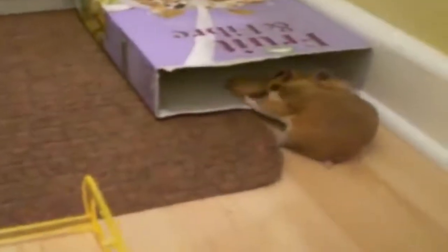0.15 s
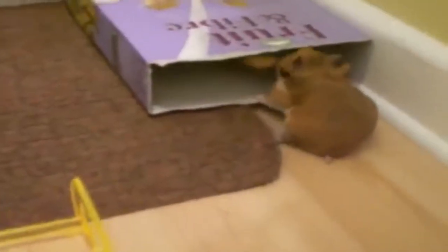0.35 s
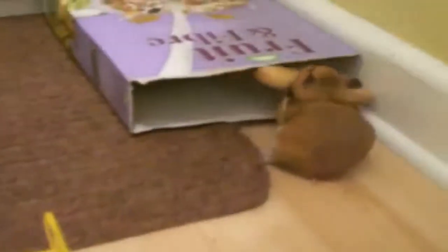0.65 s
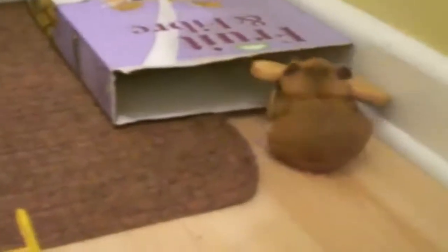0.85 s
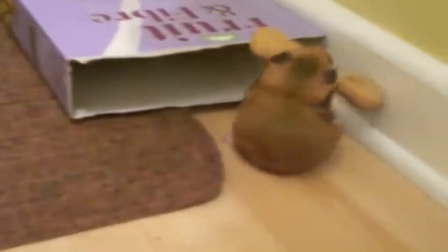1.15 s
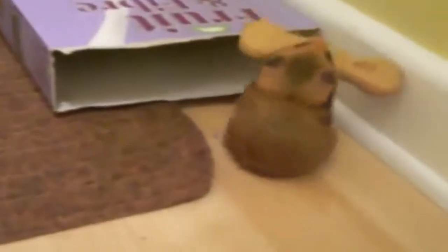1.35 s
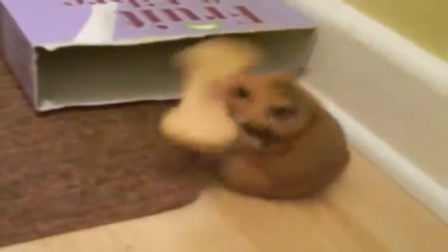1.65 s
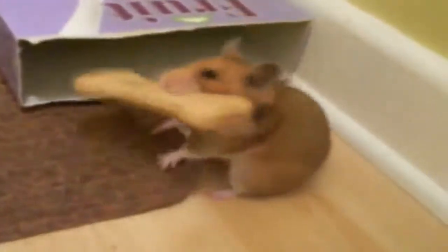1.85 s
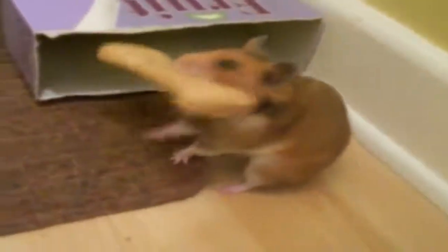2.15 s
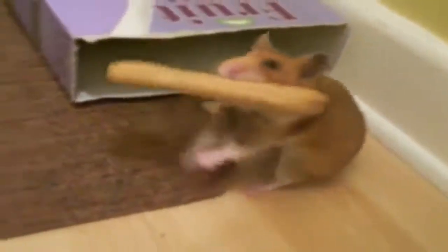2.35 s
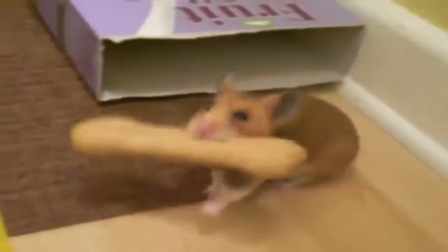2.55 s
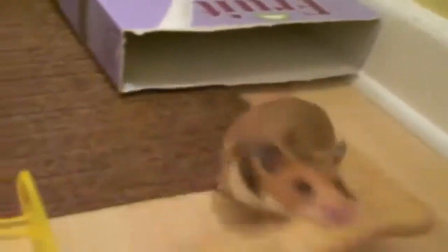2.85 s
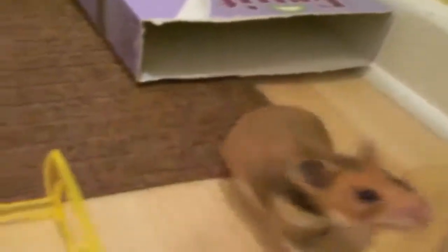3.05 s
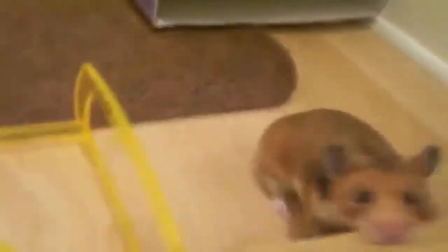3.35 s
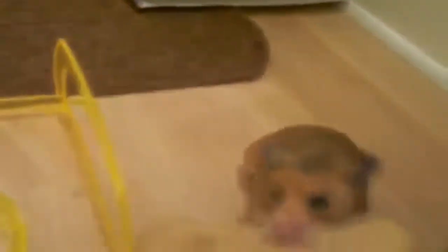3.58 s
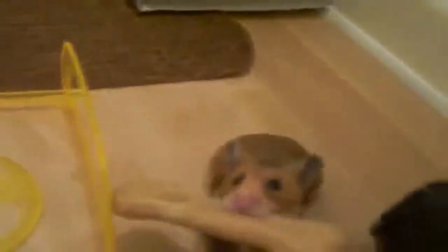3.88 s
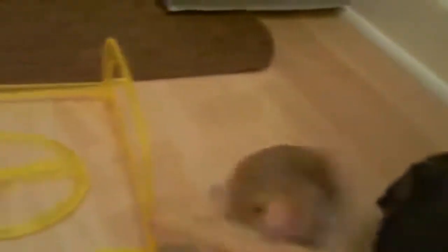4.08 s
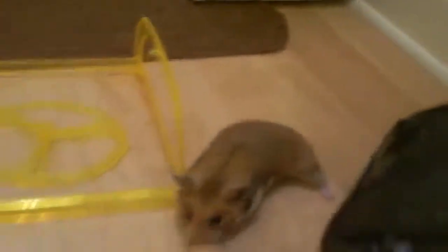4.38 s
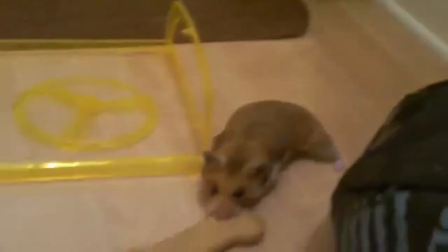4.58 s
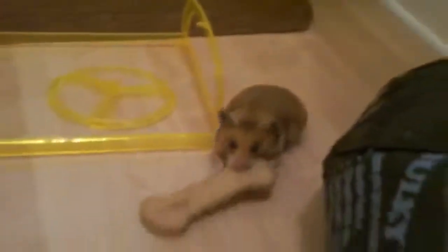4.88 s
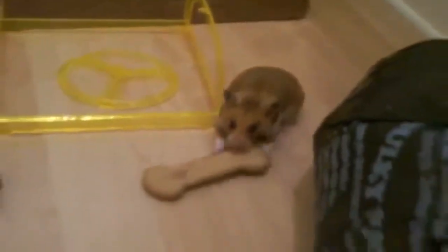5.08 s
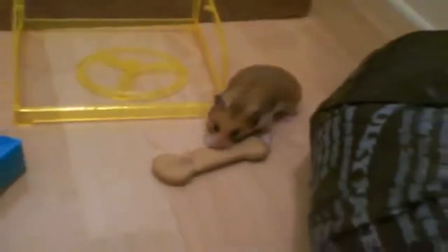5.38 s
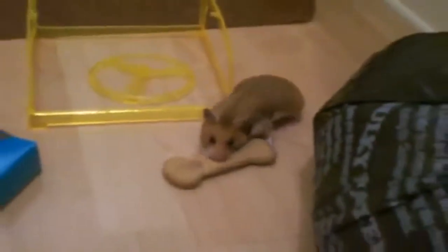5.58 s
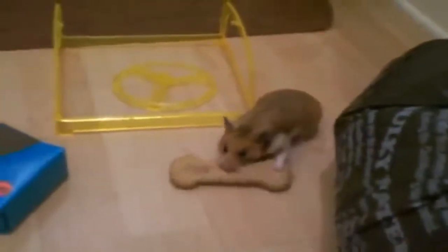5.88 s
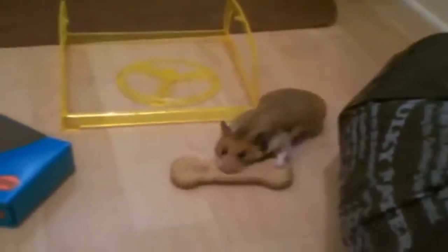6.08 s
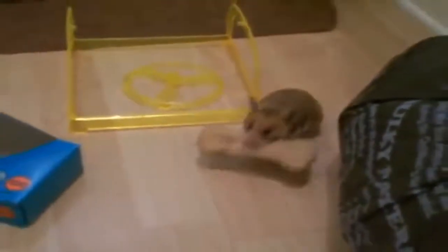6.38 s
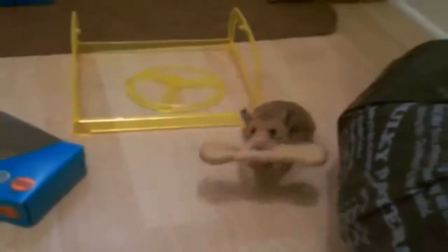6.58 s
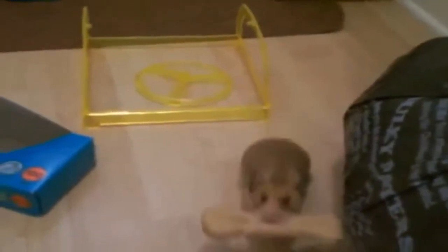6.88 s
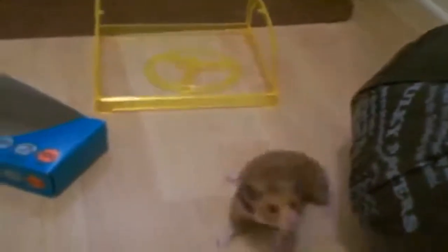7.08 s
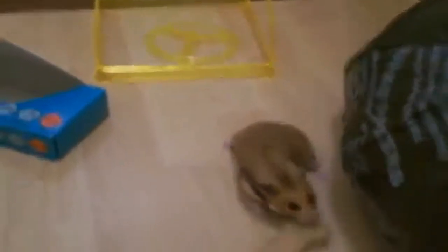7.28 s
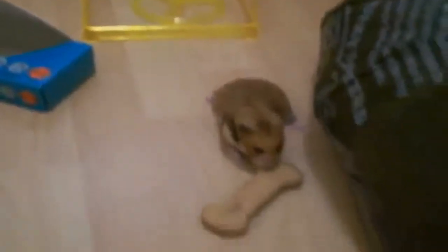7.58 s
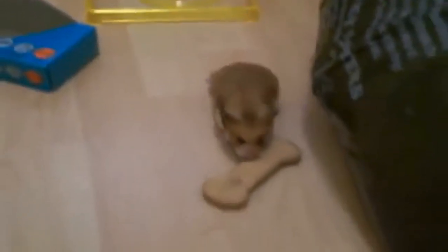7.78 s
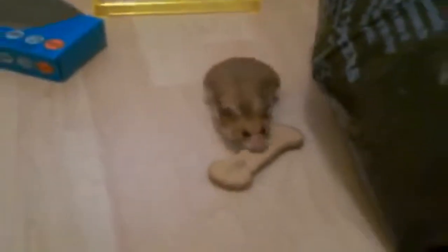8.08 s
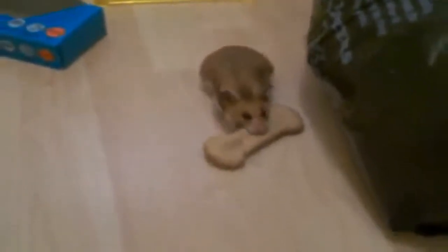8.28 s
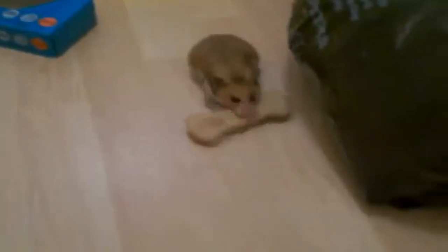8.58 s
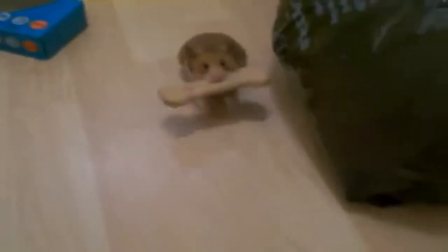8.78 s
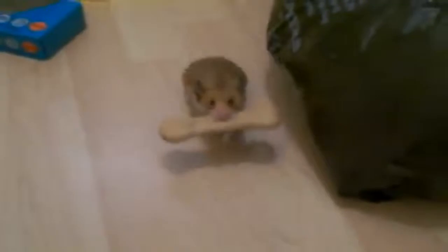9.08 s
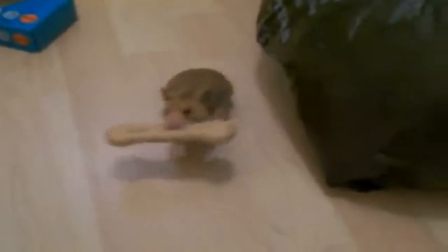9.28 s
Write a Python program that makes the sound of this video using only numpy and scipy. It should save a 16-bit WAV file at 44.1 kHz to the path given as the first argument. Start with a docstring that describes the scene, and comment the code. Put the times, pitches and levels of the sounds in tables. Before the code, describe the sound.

A hard dog biscuit dragged by a hamster scrapes and drops twice with a sharp clatter on a wooden floor in a small room.

```python
"""A hard dog biscuit, hauled by a hamster, drops twice with a clatter on a wooden floor in a small room.
Force pulses ring the decaying modes of the boards, and those of the cereal box it is first pulled out of.
Tugs scrape it along in showers of tiny knocks, and swells of grainy noise are its soft brushes past things.
Low-weighted noise and a drone lie beneath. Loud peaks pull the gain down and overload the microphone;
the sound falls silent briefly about every second and a half."""
import sys
import numpy as np
from scipy import signal
from scipy.fft import rfft, irfft, next_fast_len
from scipy.io import wavfile

SR = 44100
rng = np.random.default_rng(int(sys.argv[2]) if len(sys.argv) > 2 else 0)


def wav_out(sig):
    """Save sig, one row per channel (or a flat mono array), as 16-bit PCM at SR to the path in sys.argv[1]."""
    wavfile.write(sys.argv[1], SR, np.round(np.clip(np.atleast_2d(sig).T, -1, 1) * 32767).astype(np.int16))


N = 416744
TIME = np.arange(N) / SR  # seconds


def from_db(db):
    """Decibels to amplitude gain."""
    return 10 ** (np.asarray(db) / 20)


def rms_one(x):
    """Scale to rms 1."""
    return x / np.sqrt(np.mean(x ** 2) + 1e-20)


def at_hz(points, hz):
    """Read a table on a log-frequency axis."""
    known_hz, values = np.transpose(points)
    return np.interp(np.log(np.maximum(hz, 1)), np.log(known_hz), values)


def cut(x, hz, kind, order=2):
    """Butterworth filter."""
    return signal.sosfilt(signal.butter(order, hz, kind, fs=SR, output="sos"), x)


def coloured_noise(spectrum, size, tilt_db=0):
    """Noise of rms 1 with the given spectrum, tilted by tilt_db per octave."""
    hz = np.arange(size // 2 + 1) * SR / size
    tilt = tilt_db * np.log2(np.maximum(hz, 1))
    gain = from_db(at_hz(spectrum, hz) + tilt)
    return rms_one(irfft(rfft(rng.standard_normal(size)) * gain, size))


def ring(force, modes):
    """The force excites a decaying sine in every mode; neighbouring modes swing opposite ways."""
    out = np.zeros(N)
    for k, (hz, db, t60) in enumerate(modes):
        decay = from_db(-60 / (t60 * SR))  # per sample
        turn = 2 * np.pi * hz / SR  # radians per sample
        resonator = [1, -2 * decay * np.cos(turn), decay * decay]
        # the tiny offset keeps the filter out of denormal numbers
        mode = signal.lfilter([0, np.sin(turn)], resonator, force + 1e-18)
        out += (-1) ** k * from_db(db) * mode
    return out


# tone of the reverberation: [hz, level_db per Hz]
ROOM_COLOUR = [(100, 7.5), (400, -6), (700, -1), (1500, 6), (3000, -6), (6000, 7), (11000, 1.5)]
# how long the reverberation lasts at each pitch: [hz, t60_s]
ROOM_DECAY = [(100, 0.77), (600, 0.21), (2500, 0.23), (6000, 0.22), (12000, 0.3)]


def room(count, wet_db, build_s=0.001, size=16384):
    """Paths to the microphone: direct sound, then a diffuse tail whose bands decay at their own rates."""
    age, paths = TIME[:size], np.zeros((count, size))
    edges_hz = np.geomspace(110, 14080, 8)  # octave bands
    for low, high in zip(edges_hz, edges_hz[1:]):
        centre_hz = np.sqrt(low * high)
        # the tail swells within milliseconds, then dies away
        decay = from_db(-60 * age / at_hz(ROOM_DECAY, centre_hz))
        envelope = decay * (1 - np.exp(-(age / build_s) ** 2))
        band = cut(rng.standard_normal((count, size)), [low, high], "band")
        gain = from_db(wet_db + at_hz(ROOM_COLOUR, centre_hz))
        paths += gain * band * envelope / np.linalg.norm(envelope)
    paths[:, 0] = 1  # direct sound
    return paths


def contacts(rows, wet_db, crunch_db, crunch_s=0.0021, crunch_hz=1500, size=1024):
    """One force pulse a blow, shorter and brighter the harder the contact, each with its own room path."""
    force = np.zeros(N)
    for (start_s, db, hardness_hz), path in zip(rows, room(len(rows), wet_db)):
        age = 2 * np.pi * hardness_hz * TIME[:size]
        pulse = age * np.exp(-age)
        # the crumbly crust grinds on for an instant
        grit = cut(rng.standard_normal(size), crunch_hz, "high")
        crust = from_db(crunch_db) * grit * np.exp(-TIME[:size] / crunch_s)
        crunchy_pulse = pulse + np.convolve(pulse, crust)[:size]
        blow = signal.fftconvolve(crunchy_pulse, path) / pulse.sum()
        at = round(start_s * SR)
        force[at:at + len(blow)] += from_db(db) * blow
    return force


# spectrum of the quiet background noise: [hz, level_db per Hz]
BACKGROUND_COLOUR = [(15, -59.5), (25, 5), (48, -23.5), (109, 3), (145, -17), (269, 1.5), (298, -4.5),
                     (358, -4), (513, -4), (631, -5), (718, -5.5), (797, -8.5), (7350, -20.5),
                     (9510, -18.5), (12000, -24.5), (15600, -70.5), (22000, -120)]
# slow drift of the background: [time_s, noise_db, drone_db]
BACKGROUND_LEVELS = [(0, -53.5, -59.5), (2.8, -54.5, -59), (4, -50.5, -55.5), (6.501, -52.5, -54),
                     (9.4, -50.5, -55)]
# low resonances of the room: [pitch_hz, level_db, t60_s]
DRONE_MODES = [(86, -2.5, 0.2), (110, -6.5, 0.36), (173.2, 0, 0.22), (217, -11, 1), (255.2, -11, 0.5),
               (364.3, -0.5, 0.19)]


def background():
    """Low-weighted noise, and a drone of noise ringing in the room's resonances; both drift slowly in level."""
    time_s, noise_db, drone_db = np.transpose(BACKGROUND_LEVELS)
    noise = coloured_noise(BACKGROUND_COLOUR, next_fast_len(N))[:N]
    drone = rms_one(cut(ring(rng.standard_normal(N), DRONE_MODES), 58, "high"))
    noise_gain = from_db(np.interp(TIME, time_s, noise_db))
    drone_gain = from_db(np.interp(TIME, time_s, drone_db))
    return noise_gain * noise + drone_gain * drone


# biscuit and hamster bump the cardboard box: [start_s, strength_db, hardness_hz]
BUMPS = [(.529, -8.5, 1750), (.897, -37, 990), (.9155, -16, 1806), (1.052, -16, 646), (1.245, -25, 700),
         (1.741, -21.5, 750), (2.351, -21, 298)]
# the open box, first the short knock, then the faint after-ring: [pitch_hz, level_db, t60_s]
BOX_MODES = [(505, 5, 0.0029), (820, 3.5, 0.0092), (1150, -7, 0.013), (1520, -10, 0.006), (2390, -36, .006),
             (3800, 11.5, 0.00022), (252.7, -25, 0.21), (408.3, -17.5, 0.23), (684, -29.5, .2)]


def box(lowest_hz=200):
    """Hollow bumps: force pulses set the modes of the cardboard ringing."""
    force = contacts(BUMPS, wet_db=-3.0, crunch_db=-19.0)
    return cut(ring(force, BOX_MODES), lowest_hz, "high", order=4)


# soft brushing strokes: [peak_s, length_s, level_db before the grain, tilt_db per octave]
BRUSHES = [(0.031, 0.041, -43, -3), (0.162, 0.023, -48, -3.5), (1.18, 0.23, -52, -5),
           (1.381, 0.16, -51.5, 2), (1.887, .034, -43, -4.5), (3.378, 0.083, -47, -2),
           (3.391, 0.3, -55, 0.5), (3.601, 0.074, -51, -2), (4.093, 0.047, -33, -.5),
           (4.144, 0.041, -34.5, -.5), (5.749, 0.24, -59, -1), (6.052, 0.031, -54, 4),
           (6.954, .03, -39.5, 5), (6.989, 0.1, -47, -1), (7.925, 0.079, -47.5, -4.5)]
# colour of a brush before its tilt: [hz, level_db per Hz]
BRUSH_COLOUR = [(40, -35.5), (100, -26), (300, -3), (700, -1.5), (1500, -4.5), (2800, -3.5), (5000, -4),
                (7500, -8), (10000, -6), (12500, -14.5)]
# a stroke's swell and fade widths split its length in this share
BRUSH_RISE_SHARE = 0.52


def brushing(grain_db=4.5, grain_hz=300, size=32768):
    """Fur and biscuit slide past card, cloth and floor: swells of finely grained hiss."""
    out = np.zeros(N)
    for peak_s, length, db, tilt_db in BRUSHES:
        at = max(0, round(peak_s * SR) - size // 2)
        since = TIME[at:at + size] - peak_s
        width = length * np.where(since < 0, BRUSH_RISE_SHARE, 1 - BRUSH_RISE_SHARE)
        swell = np.exp(-(since / width) ** 2)
        out[at:at + size] += from_db(db) * swell * coloured_noise(BRUSH_COLOUR, size, tilt_db)
    # quick random flicker of the level
    grain = rms_one(cut(rng.standard_normal(N), grain_hz, "low"))
    return out * from_db(grain_db * grain)


# biscuit on the boards, first the short knock, then the faint after-ring: [pitch_hz, level_db, t60_s]
BOARD_MODES = [(607.2, -0.5, 0.028), (710, -15.5, 0.01), (843, -4, 0.011), (1810, -7, 0.0071),
               (2160, -2.5, 0.0048), (2913, -2.5, 0.0047), (3470, -5, 0.0038), (4500, 0, 0.0017),
               (6040, -1, 0.0016), (10970, 3, 0.00027), (534.3, -22.5, 0.24), (603.2, -11, 0.15),
               (701, -25.5, 0.14), (765.6, -16.5, 0.14), (812, -36.5, 0.33), (991, -39, 0.33),
               (1050, -41.5, 0.48), (1320, -40.5, 0.31)]


def boards(force, lowest_hz=420):
    """Biscuit and floor ring together and radiate little bass."""
    return cut(ring(force, BOARD_MODES), lowest_hz, "high", order=4)


# the hamster tugs the biscuit along the boards: [start_s, length_s up to the release, relative level_db]
PULLS = [(3.555, 0.056, -41.5), (3.755, .07, -44), (3.884, .1, -47.5), (4.731, 0.071, -36.5),
         (4.829, 0.064, -46), (5.48, .13, -45), (5.675, .11, -34), (5.8, 0.092, -38), (6.04, 0.091, -41),
         (7.98, 0.075, -43.5), (8.091, 0.094, -45.5), (8.312, 0.049, -43.5), (8.382, .14, -41),
         (8.55, 0.12, -51.5)]
# every tug rises, holds and fades at these rates
PULL_ATTACK_S, PULL_RELEASE_S = 0.024, .04


def pressure():
    """How hard the biscuit rubs: every tug has the same linear attack and release."""
    out = np.zeros(N)
    for start, length, db in PULLS:
        attack = np.clip((TIME - start) / PULL_ATTACK_S, 0, 1)
        release = np.clip(1 - (TIME - start - length) / PULL_RELEASE_S, 0, 1)
        out += from_db(db) * attack * release
    return out


def scraping(slips_per_s=180, spread_db=2.5, soft_hz=600, level_db=-4.0):
    """The rough biscuit catches and slips on the floor in many tiny, dull knocks."""
    sizes = from_db(spread_db * np.minimum(rng.exponential(1, N), 3))
    signs = rng.choice([-1, 1], N)
    slips = sizes * signs * (rng.random(N) < slips_per_s / SR)
    rubbing = rms_one(boards(cut(slips, soft_hz, "low")))
    return from_db(level_db) * pressure() * rubbing


# biscuit hits the floor: [start_s, strength_db, hardness_hz]
KNOCKS = [(3.339, -22, 2500), (3.352, -13.5, 1090), (3.383, -15.5, 900), (3.592, -24, 1400),
          (4.1788, 8, 1620), (4.2012, 9, 5240), (4.2137, -0.5, 3000), (4.2867, -0.5, 2520),
          (4.2922, -5, 8050), (4.330, -2.5, 1410), (4.368, -9, 700), (4.523, -17, 690), (4.967, -17, 500),
          (4.9962, -6, 700), (5.0148, -4, 2400), (5.028, -10, 2500), (5.700, -23, 655),
          (5.8815, -5.5, 2400), (5.9065, 2.5, 444), (6.180, -16.5, 640), (7.0503, 8.5, 1720),
          (7.088, 3.5, 6400), (7.1203, 1, 2500), (7.1765, -3.5, 3060), (7.1925, -9, 4000),
          (7.1985, 3.5, 4440), (7.2135, -4, 1800), (7.2502, -3.5, 2500), (7.274, -4.5, 1000),
          (7.295, -15.5, 900), (7.992, -27.5, 600), (8.424, -26.5, 643), (8.465, -29, 600),
          (8.492, -18.5, 800)]


def knocking():
    """The biscuit drops, bounces and rocks: crunchy force pulses ring the boards."""
    return boards(contacts(KNOCKS, wet_db=-1.5, crunch_db=-14.5))


def scene():
    """Everything reaches one microphone, alike in both channels."""
    friction = scraping() + brushing()
    friction_in_room = signal.fftconvolve(friction, room(count=1, wet_db=-4.0)[0])[:N]
    sound = knocking() + box() + friction_in_room + background()
    return np.array([sound, sound])


def gain_control(x, threshold_db=-2.0, most_db=12.0, release_db_per_s=17.0, attack_s=0.0016):
    """Loud peaks pull the gain down fast; it creeps back up."""
    peak_db = 20 * np.log10(np.abs(x).max(axis=0) + 1e-9)
    excess_db = np.clip(peak_db - threshold_db, 0, most_db)
    # hold each peak, sinking at the release rate
    recovery_db = release_db_per_s * TIME
    held_db = np.maximum.accumulate(excess_db + recovery_db) - recovery_db
    smooth = np.exp(-1 / (attack_s * SR))
    reduction_db = signal.lfilter([1 - smooth], [1, -smooth], held_db)
    return x * from_db(-reduction_db)


# the sound drops out: [from_s, to_s]
DROPOUTS = [(.627, .749), (2.136, 2.258), (3.646, 3.767), (5.177, 5.3), (6.688, 6.809), (8.198, 8.319)]
CUTOFF_HZ = 12050


def record(dry, ceiling=0.56, coupling_hz=45):
    """Gain control, overload, thinned sub-bass, brief dropouts and a steep top cut."""
    overloaded = np.clip(gain_control(dry), -ceiling, ceiling)
    sound = cut(overloaded, coupling_hz, "high", order=1)
    live = ~np.any([(TIME > start) & (TIME < end) for start, end in DROPOUTS], axis=0)
    top_cut = signal.ellip(10, .2, 80, CUTOFF_HZ, fs=SR, output="sos")
    return signal.sosfilt(top_cut, sound * live)


dry = scene()
out = record(dry)
wav_out(out)
```